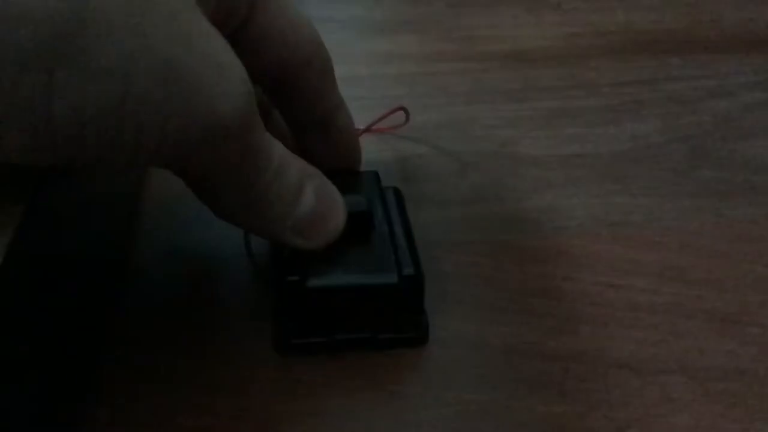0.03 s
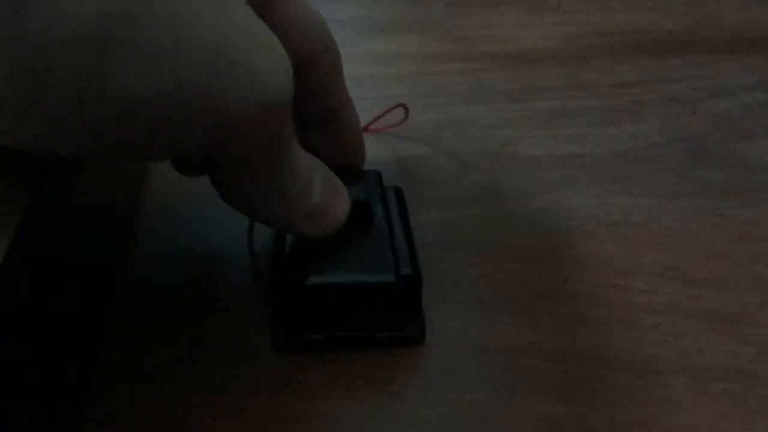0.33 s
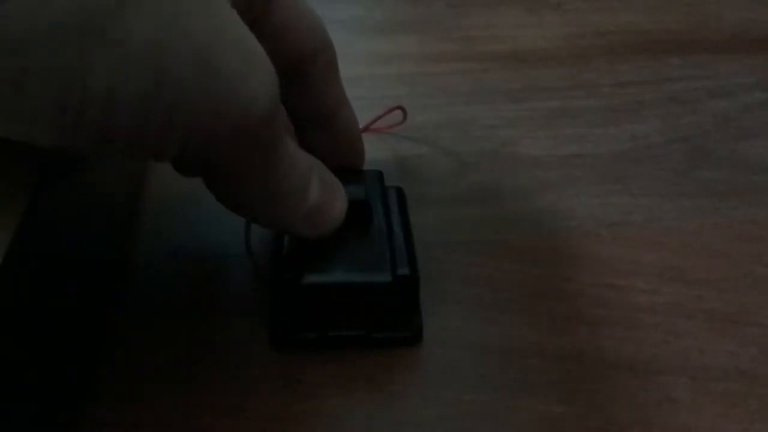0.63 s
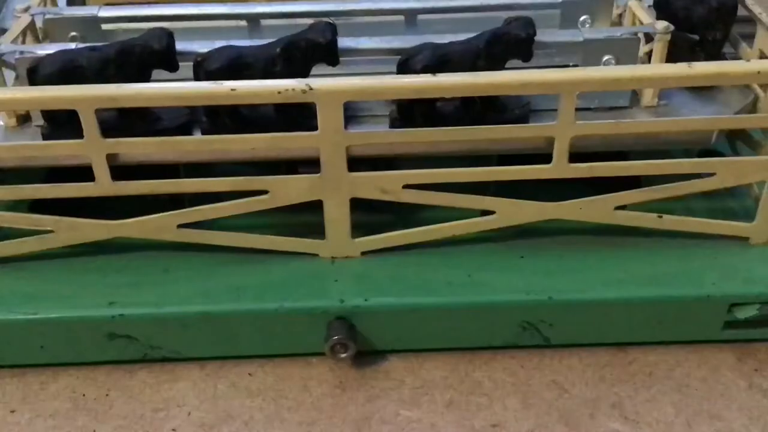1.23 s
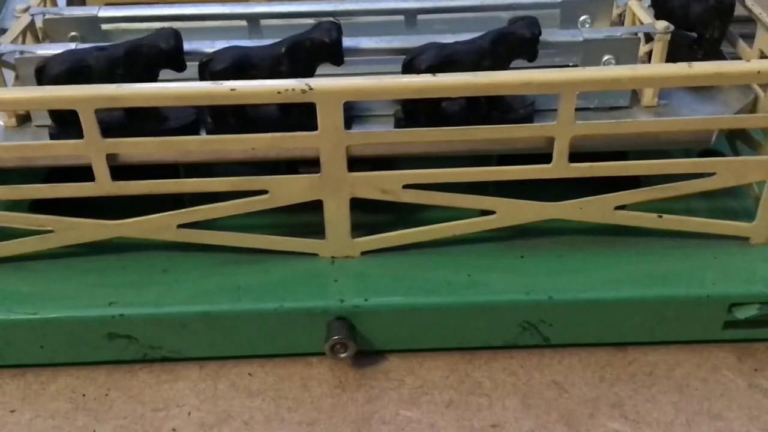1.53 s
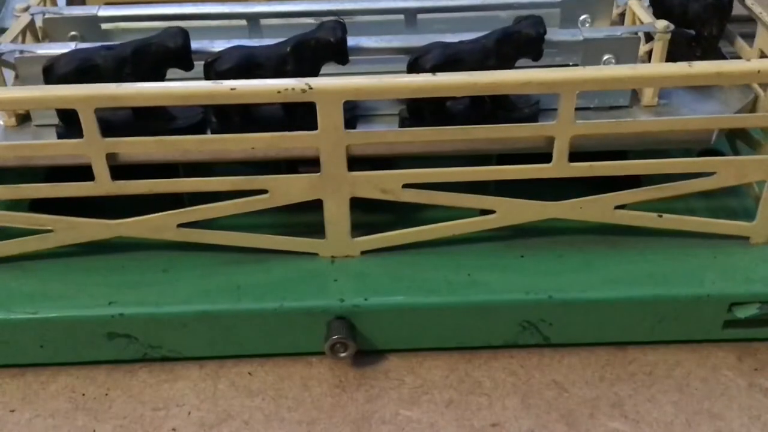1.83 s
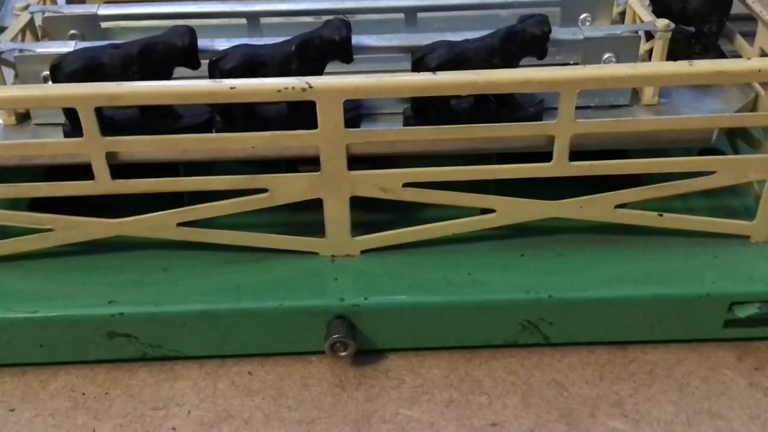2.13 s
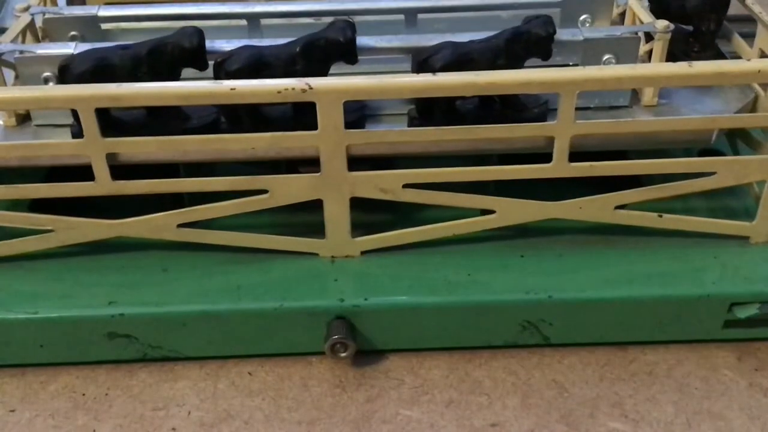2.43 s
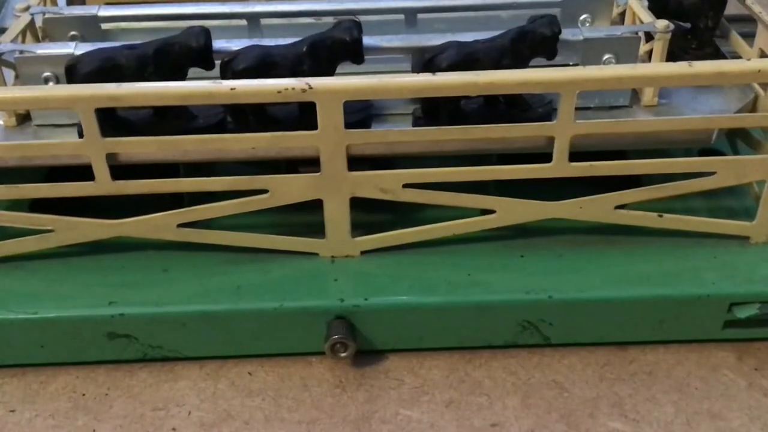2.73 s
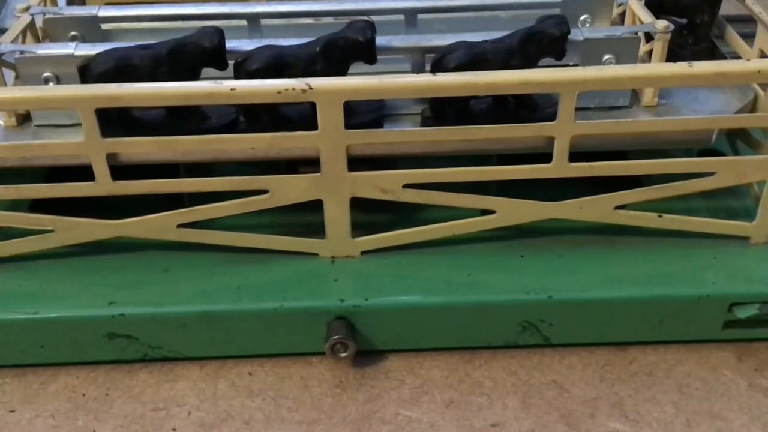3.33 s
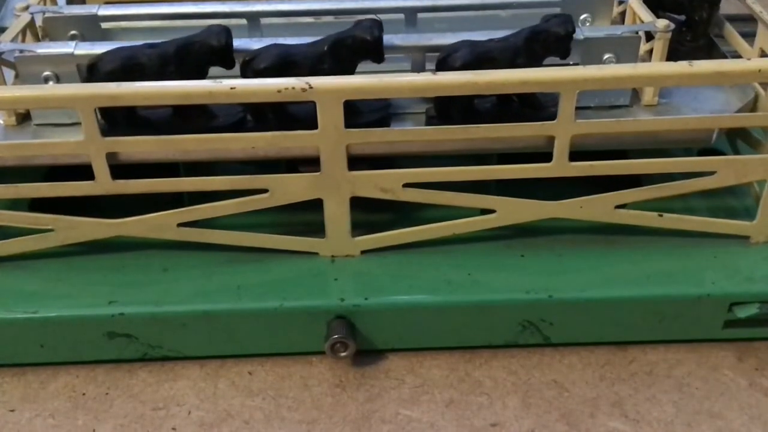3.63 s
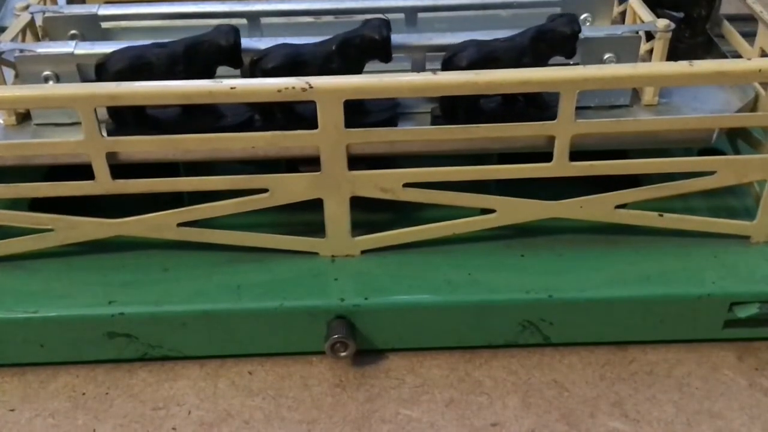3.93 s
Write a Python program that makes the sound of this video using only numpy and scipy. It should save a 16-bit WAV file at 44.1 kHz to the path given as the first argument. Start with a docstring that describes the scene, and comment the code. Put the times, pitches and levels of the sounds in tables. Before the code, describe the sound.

Harsh, rattling electric buzz of a vibrating tin toy, started by a button click.

```python
"""In a quiet room, a push button on a wooden table clicks and starts the mains vibrator of a tin toy
stockyard. The armature strikes the sheet-metal deck twice per mains cycle, and the toy cattle rattle on
it: a loose clatter settles into a bright, harsh buzz. After a quick fade to a second position the buzz
is fuller, over a harmonic hum and a low rumble. Hum and rumble step up, the cattle shift once, and a
dull knock sounds near the end."""
import sys
import numpy as np
from scipy import signal
from scipy.fft import rfft, irfft
from scipy.io import wavfile
from scipy.ndimage import uniform_filter1d

SR = 44100
rng = np.random.default_rng(int(sys.argv[2]) if len(sys.argv) > 2 else 0)


def pcm_store(signal):
    """Save signal as 16-bit PCM."""
    levels = np.round(np.clip(np.atleast_2d(signal), -1, 1) * 32767)
    wavfile.write(sys.argv[1], SR, levels.astype(np.int16).T)


N = 176400
T = np.arange(N) / SR
HZ = np.fft.rfftfreq(N, 1 / SR)

STRIKE_HZ = 119.9  # twice the mains frequency
START_S, RISE_S, SETTLED_S = 0.2404, 0.011, 0.69  # the vibrator takes a while to strike evenly
FADE_START_S, FADE_BOTTOM_S, FADE_END_S = 1.041, 1.072, 1.098  # from the first position to the second
STEP_S, STEP_LENGTH_S = 2.335, 0.02  # the hum gets heavier


def amp(db):
    """Amplitude ratio of a level: a factor of ten per 20 dB."""
    return 10 ** (np.asarray(db) / 20)


def unit(x):
    """Normalisation to unit RMS."""
    return x / np.sqrt(np.mean(x ** 2) + 1e-20)


def ramp(start, end):
    """Linear envelope from 0 to 1 between two times."""
    return np.clip((T - start) / max(end - start, 1e-4), 0, 1)


def add(mix, start_s, sound):
    """Superposition of a sound on the mix from a given time."""
    part = mix[round(start_s * SR):][:len(sound)]
    part += sound[:len(part)]


def colour(points, hz=HZ):
    """Spectral envelope: gain interpolated over log frequency from (frequency [Hz], level [dB])."""
    f, db = np.transpose(points)
    return amp(np.interp(np.log(hz + 1), np.log(f + 1), db))


def shaped(x, gain):
    """Linear filtering as a product of spectra, scaled to unit RMS."""
    return unit(irfft(rfft(x) * gain, N))


def wander(rate_hz):
    """Random modulation: low-passed noise of unit RMS."""
    return shaped(rng.standard_normal(N), 1 / (1 + (HZ / rate_hz) ** 2))


# Spectrum of the room noise (frequency [Hz], relative density [dB])
ROOM_SPECTRUM = [(30, -23), (110, -1.5), (400, -9), (700, -10), (1500, -28), (15000, -46)]


def room():
    """Ambient noise: stationary and random, with most of its power at low frequencies."""
    return amp(-60.5) * shaped(rng.standard_normal(N), colour(ROOM_SPECTRUM))


# Button contacts (time [s], relative crack level [dB], relative ring level [dB])
BUTTON_CONTACTS = [(0.053, -75, -53), (.137, -74, -58), (.2032, -44, -54), (0.2142, -36, -58),
                   (.2236, -21, -16), (0.2262, -5.5, -9), (.2360, -25, -12)]
# Spectrum of the crack (frequency [Hz], relative density [dB])
CRACK_SPECTRUM = [(300, -17), (1100, -12), (1900, 0), (2740, -34), (4140, 0), (6360, -3.5), (9760, 3),
                  (12500, -20), (15500, -12)]
# Modes of the button case (frequency [Hz], relative level [dB], time to fall 60 dB [s])
CASE_MODES = [(1550, -8, 0.011), (1770, 3.5, 0.016), (690, -21, 0.031)]


def button():
    """Impact excitation: the switch snaps, and the damped modes of its plastic case ring briefly."""
    out, t = np.zeros(N), np.arange(4096) / SR
    crack_gain = colour(CRACK_SPECTRUM, np.fft.rfftfreq(len(t), 1 / SR))
    ring = sum(amp(db - 60 * t / t60) * np.sin(2 * np.pi * f * t) for f, db, t60 in CASE_MODES) / 2
    for s, crack_db, ring_db in BUTTON_CONTACTS:
        burst = rng.choice([-1, 1], len(t)) * (np.exp(-t / 0.00045) + 0.046 * np.exp(-t / 0.0088))
        crack = irfft(rfft(np.roll(burst, len(t) // 2)) * crack_gain)  # onset at mid-buffer
        add(out, s - t[-1] / 2, amp(crack_db) * np.tanh(2.5 * crack / abs(crack).max()))
        add(out, s, amp(ring_db) * ring)
    return out


# Low knocks (time [s], level [dB], initial frequency [Hz], final frequency [Hz], time constant [s])
LOW_KNOCKS = [(0.226, -29, 240, 82, 0.0083), (2.338, -54, 300, 80, .008), (3.554, -30, 376, 80.4, 0.012)]


def knocks():
    """Damped oscillation: dull thumps whose frequency glides down as they die."""
    out, t = np.zeros(N), np.arange(SR // 5) / SR
    for s, db, first_hz, last_hz, decay_s in LOW_KNOCKS:
        hz = last_hz + (first_hz - last_hz) * np.exp(-t / 0.0096)
        envelope = amp(db) * t / decay_s * np.exp(1 - t / decay_s)
        add(out, s, envelope * np.sin(2 * np.pi * np.cumsum(hz) / SR))
    return out


def strikes(phase_s, jitter_s, swing_s, uneven_db):
    """Periodic forcing: one slightly uneven impulse per pull of the armature, every other one delayed."""
    count = int(N / SR * STRIKE_HZ) - 2
    late, size = rng.standard_normal((count, 2)).T
    k = np.arange(count) + 1
    at = (phase_s % (1 / STRIKE_HZ) + k / STRIKE_HZ + jitter_s * late + swing_s * (k % 2)) * SR
    taps = at.astype(int)[:, None] + np.arange(-8, 9)  # sinc pulses can fall between samples
    out = np.zeros(N)
    np.add.at(out, taps % N, amp(uneven_db * size)[:, None] * np.sinc(taps - at[:, None]))
    return out


def resonances(modes, lift_db):
    """Resonance: Lorentzian peaks add in power to a flat response."""
    peaks = sum(amp(db + lift_db) ** 2 / (1 + (2 * (HZ - f) / width) ** 2) for f, width, db in modes)
    return np.sqrt(1 + peaks)


def ripple(depth_db, bins):
    """Modal overlap: the many small modes of the sheet metal make its gain irregular."""
    smooth = uniform_filter1d(uniform_filter1d(rng.standard_normal(len(HZ)), bins), bins)
    return amp(depth_db * unit(smooth))


def dispersion(spread_s, bands):
    """Dispersion: each band crosses the sheet metal with its own group delay."""
    delay = spread_s * np.interp(HZ, np.linspace(0, SR / 2, bands), rng.random(bands) ** 2)
    return np.exp(-2j * np.pi * np.cumsum(delay) * SR / N)


def flicker(x, depth_db, frames):
    """Amplitude modulation: partials swell and sink at random as the load shifts on the deck."""
    spectra = signal.stft(x, nperseg=2048)[2]
    field = uniform_filter1d(rng.standard_normal(spectra.shape), 6, axis=0)
    field = uniform_filter1d(field, frames, axis=1)
    return unit(signal.istft(spectra * amp(depth_db * unit(field)), nperseg=2048)[1][:N])


def rattle(phase_s, decay_s, base, uneven_db):
    """Collision noise: a decaying burst of tiny impacts after every strike, over a bed of loose ones."""
    since_strike = (T - phase_s) % (1 / STRIKE_HZ)
    envelope = base + np.exp(-since_strike / decay_s)
    return rng.standard_normal(N) * envelope * amp(uneven_db * wander(150))


# Deck resonances that swell or sink (start [s], end [s], frequency [Hz], bandwidth [Hz], gain [dB])
DECK_SWELLS = [(0.39, .51, 4700, 1500, 1), (0.285, 0.514, 7030, 250, 5), (0.683, 0.977, 2130, 180, 3),
               (1.096, 1.77, 3880, 520, 6), (1.755, 2.097, 2750, 260, 2.5), (1.76, 2.08, 7250, 600, 6),
               (1.9, 2.303, 3120, 236, 5.5), (1.95, 2.744, 2100, 420, -2.5), (2.062, 2.92, 3400, 111, 6),
               (2.35, 2.694, 5860, 480, 6), (2.92, 4.1, 2030, 69.6, 5), (2.7, 4.1, 6020, 473, 2)]


def swelling(x, edge_s=0.03):
    """Variable loading: resonances swell and sink as the cattle shift their weight on the deck."""
    spectrum, out = rfft(x), x.copy()
    for start, end, hz, width, db in DECK_SWELLS:
        held = ramp(start - edge_s, start + edge_s) * (1 - ramp(end - edge_s, end + edge_s))
        band = irfft(spectrum / (1 + (2 * (HZ - hz) / width) ** 4), N)
        out += (amp(db * held) - 1) * band
    return out


# Deck modes at the first position (frequency [Hz], bandwidth [Hz], relative level [dB])
HARSH_DECK_MODES = [(3800, 23, -5), (5100, 260, -9), (6120, 140, -10), (7000, 36, -1), (8550, 190, 1),
                    (9460, 240, 3.5), (10250, 110, 2), (11200, 130, 2.5)]
# Spectra of its strike tone, rattle and snap (frequency [Hz], relative density [dB])
HARSH_TONE_SPECTRUM = [(250, -45), (470, -5), (1500, -9), (2100, -1), (2800, -1.5), (4200, -1.5),
                       (5800, -3), (7200, 0), (9500, -6), (15500, -17)]
HARSH_RATTLE_SPECTRUM = [(50, -34), (150, -7.5), (340, -11.5), (475, -6), (650, -10.5), (1500, -11),
                         (2100, -5), (4850, -0.5), (9740, -11.5), (15500, -18)]
SNAP_SPECTRUM = [(1000, -35), (2200, -10), (5500, -1), (7000, 10.5), (8200, -4), (9800, 1.5), (13000, -14)]
# Extra strikes before the armature settles (time [s], level above an even strike [dB])
EXTRA_STRIKES = [(0.249, 3), (.2915, 2), (.4326, 8)]


def harsh_buzz():
    """Transient and steady state: a jolt and a loose clatter settle into even, bright, snapping strikes."""
    snap_phase_s = 0.8073
    phase_s = snap_phase_s - 0.0014  # tone and rattle are excited just ahead of the snap
    unsettled = 1 - ramp(0.54, SETTLED_S)
    deck = resonances(HARSH_DECK_MODES, lift_db=4.0) * ripple(depth_db=3.0, bins=160)
    drive = strikes(phase_s, jitter_s=1e-5, swing_s=1e-5, uneven_db=-0.5)
    tone = shaped(drive, colour(HARSH_TONE_SPECTRUM) * deck * dispersion(0.006, bands=50))
    tone = flicker(tone, depth_db=3.0, frames=8) * amp(-25.0 - 4.3 * unsettled)
    cattle = rattle(phase_s, decay_s=0.00071, base=1.0, uneven_db=0.5)
    cattle = shaped(cattle, colour(HARSH_RATTLE_SPECTRUM) * deck) * amp(-27.0 + 3.5 * unsettled)
    blows = strikes(snap_phase_s, jitter_s=2e-5, swing_s=0, uneven_db=0.7) * amp(-3 * unsettled)
    for s, db in EXTRA_STRIKES:
        add(blows, s, amp([db]))
    snap = amp(-30.0) * shaped(blows, colour(SNAP_SPECTRUM) * deck * dispersion(0.00038, bands=24))
    jolt_gain = colour([(50, -27), (150, 0.5), (700, 1.5), (2700, 7.5), (4500, -9), (9000, -35)])
    jolt = shaped(rng.standard_normal(N), jolt_gain) * amp(-23.0) * np.exp(-abs(T - START_S) / 0.066)
    angle = 2 * np.pi * STRIKE_HZ * T
    hum = amp(-40.5) * (1 - unsettled / 2) * (np.sin(angle) + 0.45 * np.sin(2 * angle))
    return (swelling(tone + cattle) + snap + jolt + hum) * ramp(START_S, START_S + RISE_S)


# Hum partials (harmonic number, relative level before the step [dB], relative level after it [dB])
HUM_HARMONICS = [(1, -7.5, -2.5), (2, -16.5, -9.5), (3, -6.5, -3), (4, -2, 1), (5, -16, -13), (6, -4.5, 1),
                 (7, -16.5, -11), (8, -10, -12), (9, -15, -16), (10, -15.5, -21.5), (11, -20, -17.5),
                 (12, -10.5, -13), (13, -17.5, -9), (14, -17, -13.5), (15, -16, -18.5), (16, -25, -11)]


def base_hum(level_db=-35, waver_db=-63.5, waver_hz=7):
    """Forced vibration: the base flexes at harmonics of the strike rate; the weak ones waver most."""
    heavy, out = ramp(STEP_S, STEP_S + STEP_LENGTH_S), np.zeros(N)
    for k, light_db, heavy_db in HUM_HARMONICS:
        steady = amp((1 - heavy) * light_db + heavy * heavy_db + level_db)
        waver = amp(waver_db) * (wander(waver_hz) + 1j * wander(waver_hz))
        out += ((steady + waver) * np.exp(2j * np.pi * (k * STRIKE_HZ * T + rng.random()))).real
    return out


# Deck modes at the second position (frequency [Hz], bandwidth [Hz], relative level [dB])
FULL_DECK_MODES = [(2040, 21, 0), (2640, 22, 0), (2760, 12, 2.5), (3000, 14, 2.5), (3480, 13, 8.5),
                   (3840, 9.9, 8), (3960, 22, -0.5), (4200, 26, -1), (4800, 31, -0.5), (6195, 64, 5.5)]
# Spectra of its strike tone and rattle (frequency [Hz], relative density [dB])
FULL_TONE_SPECTRUM = [(2040, 1.5), (2200, 2.5), (2450, -2), (2850, -1.5), (3350, -5.5), (3700, -16),
                      (3900, -2.5), (4250, -2), (4800, -1.5), (5350, -17), (5800, -2), (6200, -14),
                      (7400, -12.5), (9400, -18.5), (15500, -18.5)]
FULL_RATTLE_SPECTRUM = [(40, -35), (150, -31), (500, -10), (1750, -14), (2100, 4.5), (2330, -1), (2680, 1),
                        (3500, -5), (4600, 3), (5350, -7), (6000, -4.5), (8500, -7.5), (9600, -10.5),
                        (15500, -16)]


def deck_buzz(phase_s=1.5041, shift_s=2.88, shift_width_s=0.018):
    """Source and filter: even strikes ring the deck's modes while the cattle chatter and shift once."""
    drive = strikes(phase_s, jitter_s=6e-6, swing_s=1e-5, uneven_db=0.0)
    above_hum = np.clip(HZ / STRIKE_HZ - len(HUM_HARMONICS), 0, 1) ** 2
    deck = resonances(FULL_DECK_MODES, lift_db=4.0) * dispersion(0.009, bands=70)
    tone = shaped(drive, colour(FULL_TONE_SPECTRUM) * deck * above_hum)
    tone = amp(-32.5) * flicker(tone, depth_db=1.8, frames=9)
    cattle = rattle(phase_s, decay_s=0.00033, base=0.69, uneven_db=0.0)
    cattle = shaped(cattle, colour(FULL_RATTLE_SPECTRUM) * ripple(depth_db=1.5, bins=110))
    chatter = amp(-34.5) * flicker(cattle, depth_db=2.5, frames=5)
    shift = shaped(cattle, 1 / (1 + ((HZ - 2200) / 400) ** 4))
    shift *= amp(-37) * np.exp(-((T - shift_s) / shift_width_s) ** 2)
    return swelling(tone + chatter) + shift


# Spectrum of the shaking table (frequency [Hz], relative density [dB])
RUMBLE_SPECTRUM = [(20, -60), (45, -24), (70, 2), (110, -3), (180, -14), (400, -23.5)]


def table_rumble():
    """Structure-borne sound: low, lumpy shaking of the table, stronger with the heavy hum."""
    heavy = ramp(STEP_S, STEP_S + STEP_LENGTH_S)
    shaking = shaped(rng.standard_normal(N), colour(RUMBLE_SPECTRUM))
    return shaking * amp(-61.5 + 7.7 * heavy + 1.4 * wander(8.8))


def scene():
    """Superposition of the room, the button, the knocks and the buzz from two positions in turn."""
    mix = room() + button() + knocks()
    mix += harsh_buzz() * (1 - ramp(FADE_START_S, FADE_BOTTOM_S))
    mix += (base_hum() + deck_buzz() + table_rumble()) * ramp(FADE_BOTTOM_S, FADE_END_S)
    return mix[None]


def record(dry, cutoff_hz=15900):
    """Band limiting: a linear-phase low-pass filter removes the highest treble."""
    lowpass = signal.firwin(511, cutoff_hz, window=("kaiser", 9), fs=SR)
    return signal.oaconvolve(dry, lowpass[None], "same")


dry = scene()
out = record(dry)
pcm_store(out)
```